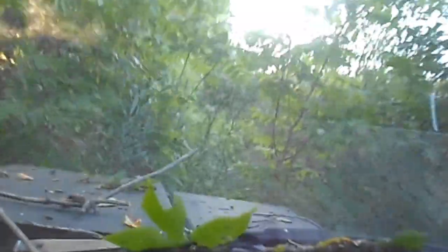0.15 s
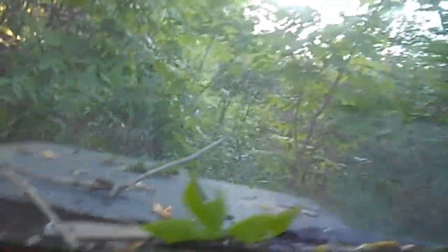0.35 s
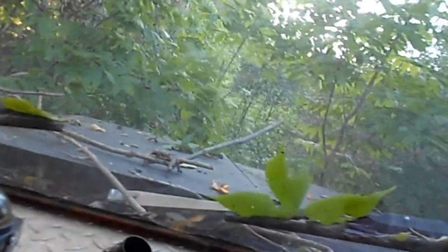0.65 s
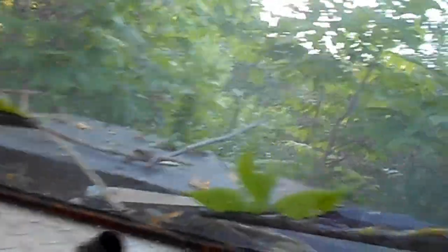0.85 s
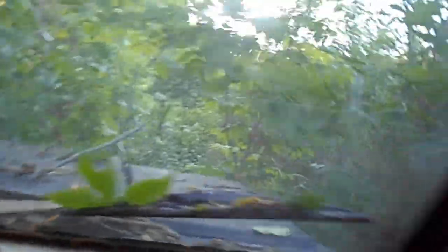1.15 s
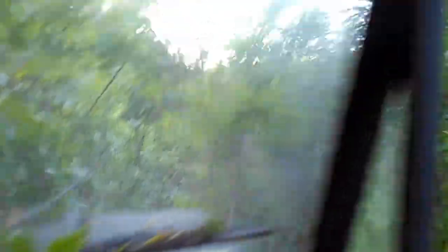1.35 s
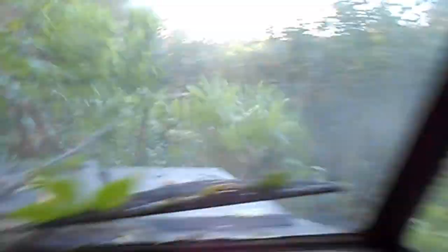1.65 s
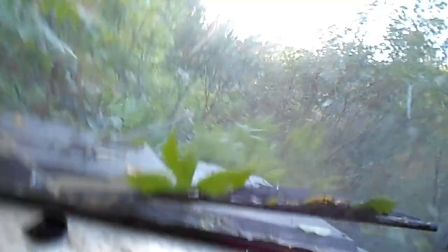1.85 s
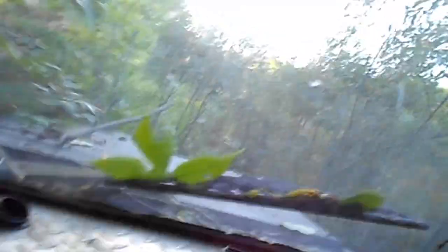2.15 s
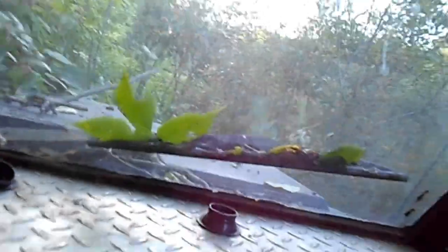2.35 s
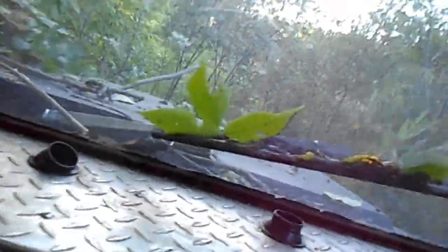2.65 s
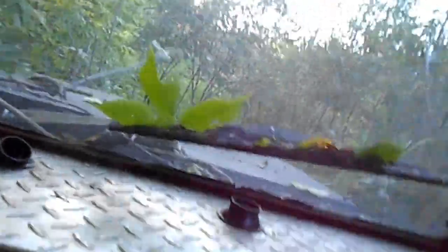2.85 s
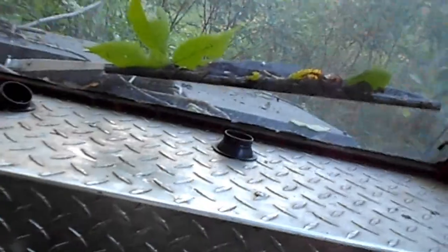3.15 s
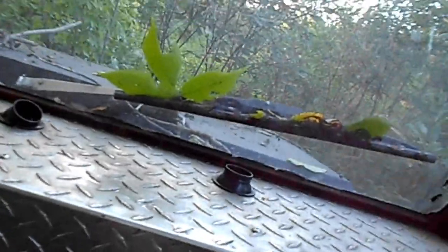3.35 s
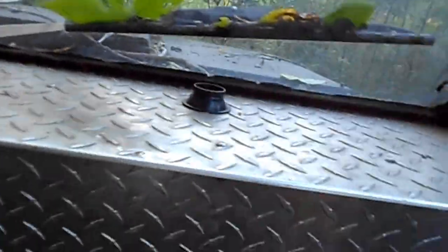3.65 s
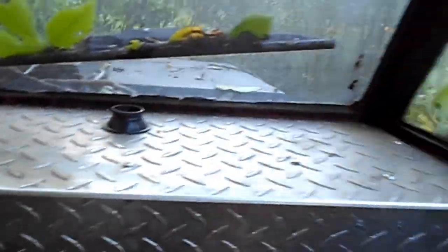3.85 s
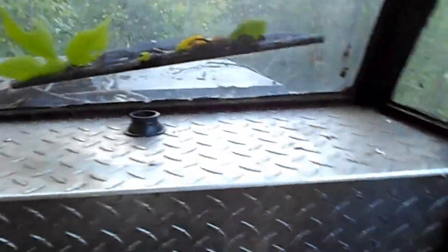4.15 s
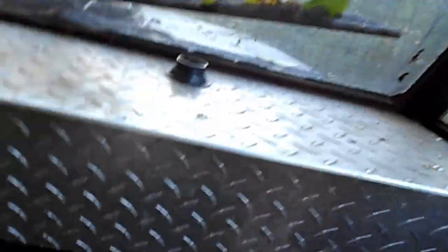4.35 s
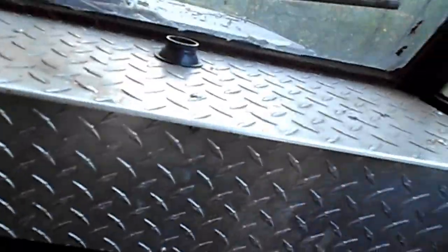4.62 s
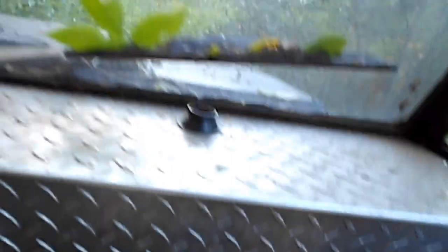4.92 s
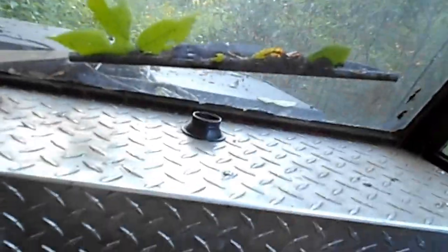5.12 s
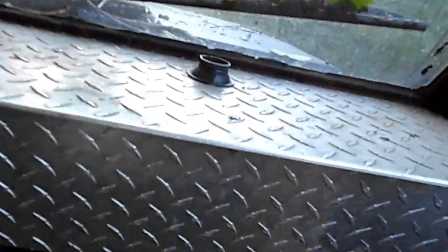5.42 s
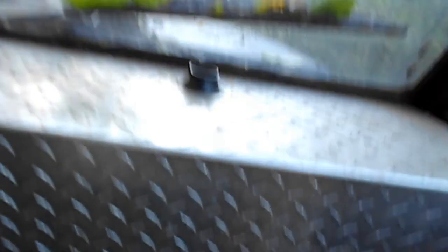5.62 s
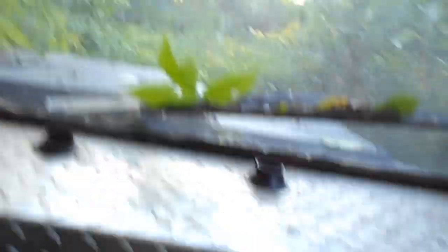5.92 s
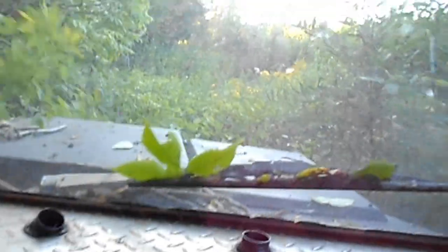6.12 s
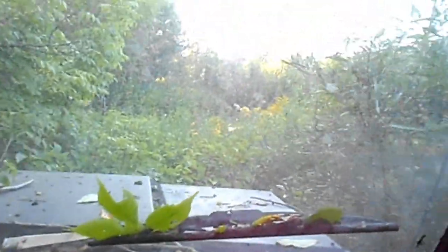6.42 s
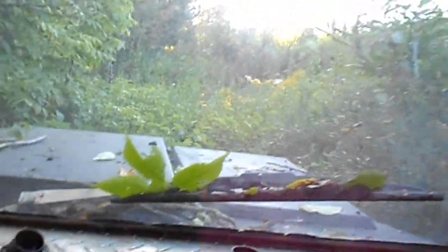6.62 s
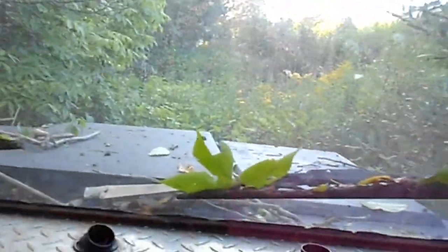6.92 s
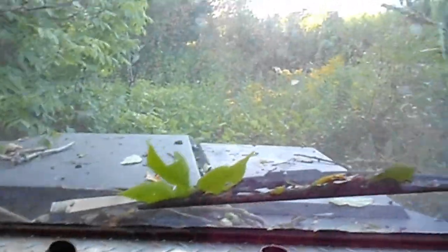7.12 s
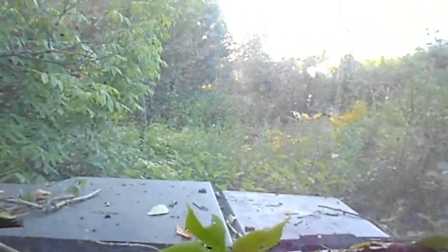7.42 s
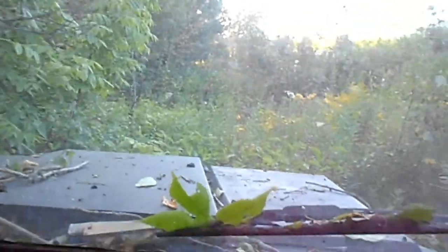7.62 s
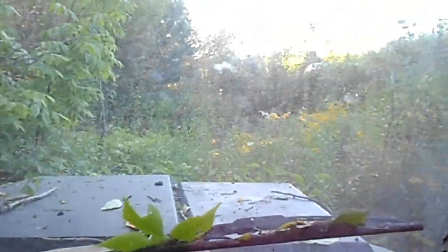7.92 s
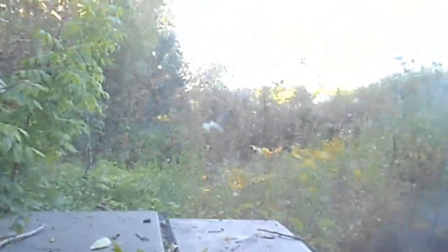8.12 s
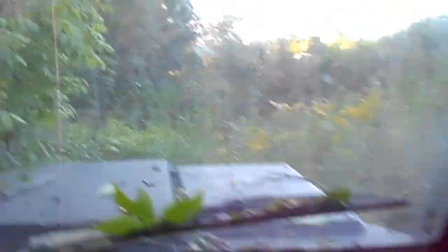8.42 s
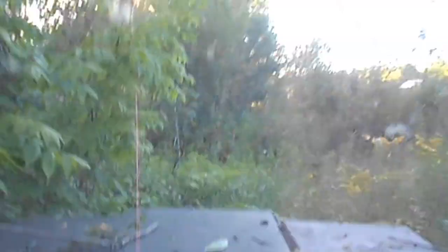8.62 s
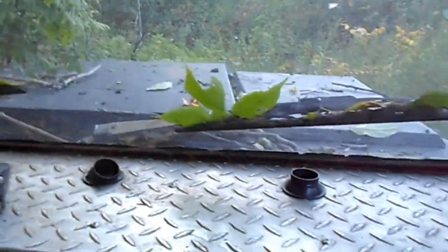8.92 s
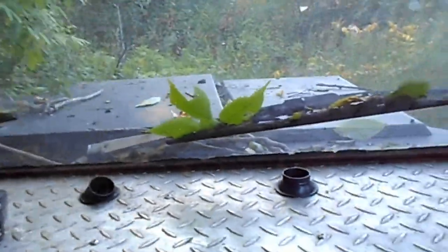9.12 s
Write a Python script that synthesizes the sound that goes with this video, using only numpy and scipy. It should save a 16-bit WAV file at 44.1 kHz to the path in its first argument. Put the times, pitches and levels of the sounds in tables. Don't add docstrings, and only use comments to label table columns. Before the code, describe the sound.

Inside a steel truck cab on an overgrown trail, a deep eight-cylinder engine booms and throbs. Leaves brush the body, twigs snap and drag. Just after two seconds the revs fall through a heavy rut, with thuds, low shudder and a short squeak near four. A steadier crawl follows, then revs leap at seven and a half and drop at nine. Close, handheld cab perspective, bass-heavy, with dull treble.

```python
import sys
import numpy as np
from scipy import signal
from scipy.io import wavfile

SR = 44100
rng = np.random.default_rng(int(sys.argv[2]) if len(sys.argv) > 2 else 0)


def voltage_ratio(level):
    return 10 ** (np.asarray(level, float) / 20)


def to_wav(s):
    ch = np.atleast_2d(s).T
    pcm = np.round(np.clip(ch, -1, 1) * 32767)
    wavfile.write(sys.argv[1], SR, pcm.astype(np.int16))


N = 408807
TIME = np.arange(N) / SR


def rms_one(x):
    return x / np.sqrt(np.mean(x ** 2) + 1e-20)


def in_time(rows):
    s, *columns = np.transpose(rows)
    return [np.interp(TIME, s, c) for c in columns]


def swell(centre, half):
    first, last = round((centre - 3 * half) * SR), round((centre + 3 * half) * SR)
    span = slice(max(first, 0), last)
    return span, np.exp(-((TIME[span] - centre) / half) ** 2)


def bells(rows):
    out = np.zeros((len(rows[0]) - 2, N))
    for centre, half, *heights in rows:
        span, bell = swell(centre, half)
        out[:, span] += np.outer(heights, bell)
    return out


def drift(rate, count=N):
    r = np.exp(-80 * np.pi * rate / SR)
    noise = rng.standard_normal(N // 40 + 2002)
    slow = signal.lfilter([1], [1, -2 * r, r * r], noise)[2000:]
    return np.interp(np.linspace(0, N / 40, count), np.arange(len(slow)), rms_one(slow))


def sine(turns):
    return np.sqrt(2) * np.cos(2 * np.pi * turns)


def band(x, low_hz, high_hz):
    return signal.sosfilt(signal.butter(2, [low_hz, high_hz], "band", fs=SR, output="sos"), x)


def resonate(x, hz, width):
    r = np.exp(-np.pi * width / SR)
    top = (1 - r * r) / 2
    return signal.lfilter([top, 0, -top], [1, -2 * r * np.cos(2 * np.pi * hz / SR), r * r], x)


def coloured(spectrum, patchy_db, flicker_rate, grain_db):
    hz, level_db = np.transpose(spectrum)
    edges = hz[0] * 2 ** np.arange(0, np.log2(min(hz[-1], 13500) / hz[0]), 1 / 3)
    white = rng.standard_normal((2, N)) * voltage_ratio(grain_db * drift(91))
    out, together = 0, drift(flicker_rate)
    for k, (low, high) in enumerate(zip(edges, edges[1:])):
        mean_db = np.interp(np.log(low * high) / 2, np.log(hz), level_db)
        flicker_db = patchy_db * (1.51 * together + drift(flicker_rate))
        out = out + voltage_ratio(mean_db + flicker_db) * band(white[k % 2], low, high)
    return rms_one(out)


# time in seconds, firings per second.
SPEED = [(0.0, 52.45), (0.47, 50.07), (0.81, 58.47), (1.34, 60.6), (2.0, 58.59), (2.13, 60.85),
         (2.27, 51.68), (2.66, 41.88), (2.79, 45.44), (3.6, 42.9), (4.35, 43.67), (4.65, 48.12),
         (7.46, 47.85), (7.65, 61.56), (7.8, 63.91), (8.91, 63.93), (9.09, 51.1), (9.27, 46.15)]
# centre in seconds, half length in seconds,
# extra firings per second.
SPEED_WAVERS = [
    (6.05, .2, -.4),
    (6.7, .25, .68),
    (7.27, .13, -1.17),
    (8.0, .3, .36),
    (8.53, .14, -1.13),
    (8.8, .07, 1.85),
]


def engine_speed():
    return in_time(SPEED)[0] + bells(SPEED_WAVERS)[0]


# multiple of the cycle rate, level in dB at low revs, level in dB at high revs.
UNEVEN = [(3, -51, -46), (4, -51, -45), (5, -49, -41), (6, -48, -34), (7, -35, -25), (9, -34, -29),
          (10, -40, -36), (11, -38, -44), (12, -42, -45), (13, -44, -46), (14, -53, -45), (15, -53, -42),
          (17, -48, -42), (18, -43, -47), (19, -45, -43), (20, -48, -52), (21, -45, -47), (22, -49, -53),
          (23, -46, -52), (24, -51, -57), (25, -50, -61)]
LOW_REVS_HZ, HIGH_REVS_HZ = 49, 58
# firing tone in Hz, its level in dB, its octave's level in dB.
CAB = [(43, -12.0, -55), (46, -11.0, -39), (48, -11.0, -38), (52, -11.4, -35.5), (56, -11.8, -34),
       (59.5, -13.8, -31.5), (64, -13.5, -34.5)]
# time in seconds, level in dB.
THROTTLE = [
    (2.09, -1),
    (2.18, -10),
    (2.67, -12),
    (2.76, -6),
    (3.45, -0.5),
    (8.82, 0.0),
    (9.0, -10),
    (9.13, -3.5),
    (9.27, -6),
]
# centre in seconds, half length in
# seconds, change in dB.
BOOM_SWINGS = [(.55, 0.14, 2), (1.1, 0.94, 2), (2.31, 0.041, 15.5), (2.41, 0.02, 5.5), (2.37, .012, -6),
               (2.47, 0.02, -10), (2.66, .03, -2), (2.53, .03, 4.5), (2.815, 0.022, 7.5), (4.5, 0.12, 1),
               (7.42, 0.097, 1.7)]


def engine(firing_hz, firings):
    throttle_db, = in_time(THROTTLE)
    hz, tone_db, octave_db = np.transpose(CAB)
    tone_db = np.interp(firing_hz, hz, tone_db) + throttle_db + bells(BOOM_SWINGS)[0]
    octave_db = np.interp(firing_hz, hz, octave_db) + 0.67 * throttle_db
    revs = np.clip((firing_hz - LOW_REVS_HZ) / (HIGH_REVS_HZ - LOW_REVS_HZ), 0, 1)
    effort_db = .6 * np.minimum(tone_db + 12, 0)
    revs, effort_db, cycles = revs[::16], effort_db[::16], firings[::16] / 8
    points = len(revs)
    throb = 0
    for order, low_db, high_db in UNEVEN:
        from_firing = abs(order - 8)
        wander = .02 * min(from_firing, 5) * drift(.5, points)
        level_db = low_db + revs * (high_db - low_db) + effort_db + 1.5 * drift(1.5, points) + .5
        start = .1 if from_firing < 3 else rng.random()
        throb = throb + voltage_ratio(level_db) * sine(order * cycles + start + wander)
    tone = voltage_ratio(tone_db) * sine(firings - .05)
    octave = voltage_ratio(octave_db) * sine(2 * firings - .4)
    return tone + octave + signal.resample_poly(throb, 16, 1)[:N]


# time in seconds, level in dB.
RIDE = [(.07, 1), (.8, -2), (1.42, 3), (1.86, 4.5), (2.22, 8.5), (2.5, -1), (2.81, 5.5), (3.33, -1),
        (4.16, 8), (4.49, 4), (5.27, 1), (5.4, 0), (7.2, 0), (7.92, -2.5), (8.85, 3), (9.27, 2.5)]
# centre in seconds, half length in seconds, dB more in the chassis, dB more in the body.
RUTS = [
    (0.0, 0.061, 9, 11.5),
    (2.34, 0.097, 13.5, 6.5),
    (4.24, 0.044, 8, 6.5),
    (4.1, 0.38, -2, -0.5),
    (5.32, 0.041, -.5, 9.5),
    (7.3, 0.097, -1.5, 4.5),
    (7.5, 0.35, 6, -1),
    (8.83, 0.048, -4, 3),
]
# frequency in Hz, dB per Hz.
RUMBLE = [(10, -14), (25, -7), (40, -3), (55, -1), (75, -2), (90, -10), (130, -13), (165, -17), (200, -30)]
GROWL = [(140, -2.5), (180, 1), (250, -6.5), (350, -12.5), (450, -26)]
ROAR = [(240, -27.5), (400, -3), (512, -6), (638, -8), (752, -2.5), (1060, -8), (1380, -15.5), (1650, -19),
        (8210, -42), (10700, -61), (13900, -73), (22000, -120)]


def chassis(firings):
    rough_db, = in_time(RIDE)
    chassis_db, body_db = bells(RUTS)
    rumble_db = -34.5 + 0.81 * rough_db + chassis_db
    growl_db = -44.4 + 0.98 * rough_db + body_db
    roar_db = -51 + rough_db + body_db
    rumble = voltage_ratio(rumble_db) * coloured(RUMBLE, patchy_db=1.5, flicker_rate=9.7, grain_db=1.5)
    growl = voltage_ratio(growl_db) * coloured(GROWL, patchy_db=0.9, flicker_rate=33.0, grain_db=2.0)
    roar = coloured(ROAR, patchy_db=1.5, flicker_rate=9.0, grain_db=1.2)
    roar = roar + voltage_ratio(5) * resonate(roar, 600, 42) + voltage_ratio(2.5) * resonate(roar, 1250, 40)
    puffs = 1 + .2 * sine(firings + .3)
    return rumble + puffs * (growl + voltage_ratio(roar_db) * roar)


# time in seconds, level in dB.
BRUSH = [(0.0, -59), (0.98, -61.5), (1.81, -55), (2.22, -52), (2.37, -62.5), (2.61, -61.5), (3.36, -58),
         (3.44, -52), (3.95, -56.5), (4.16, -49.5), (4.85, -57.5), (5.83, -57), (6.12, -55.5),
         (7.07, -59.5), (7.25, -56.5), (7.67, -64), (8.44, -63.5), (9.27, -57.5)]
# frequency in Hz, dB per Hz.
LEAVES = [(710, -31.5), (1200, -2), (1760, -11), (2020, -10), (2540, -17.5), (4390, -16), (8800, -25),
          (9910, -25), (10700, -39.5), (13900, -65), (22000, -120)]
# frequency in Hz, width in Hz, level in dB.
BODY_RINGS = [(1950, 40, -4), (2440, 30, -3), (3160, 60, -4), (3470, 35, -2), (4230, 80, -5)]


def leaves(firings):
    brush_db, = in_time(BRUSH)
    brush = voltage_ratio(brush_db + 3.5) * coloured(LEAVES, patchy_db=1.15, flicker_rate=20.0, grain_db=-0.5)
    brush = brush + sum(voltage_ratio(db) * resonate(brush, hz, width) for hz, width, db in BODY_RINGS)
    return brush * (1 + 0.15 * sine(firings))


def chatter(firings):
    rough_db, = in_time(RIDE)
    touches_per_s = 260 * voltage_ratio(4.0 * drift(6)) * (1 + .6 * np.cos(2 * np.pi * firings))
    strength = voltage_ratio(2.0 * np.minimum(rng.exponential(1, N), 4)) * rng.choice([-1, 1], N)
    touches = (rng.random(N) < touches_per_s / SR) * strength
    dealt = rng.integers(0, 30, N)
    pitches = np.geomspace(260, 4200, 30) * rng.uniform(.96, 1.04, 30)
    rings = 0
    for k, hz in enumerate(pitches):
        ring = resonate(touches * (dealt == k) + 1e-18, hz, 2.2 * hz / 45)
        slope_db = -6.5 * np.log2(hz / 600) * (hz > 600)
        rings = rings + voltage_ratio(slope_db) * rms_one(ring)
    return voltage_ratio(-55 + rough_db) * rms_one(rings)


# centre in seconds, half length in seconds, frequency in Hz, level in dB.
JOLTS = [(2.13, 0.035, 147, -24), (2.22, 0.063, 154, -29.5), (2.32, 0.027, 146, -24),
         (2.334, 0.021, 30, -10), (2.78, 0.045, 150, -27), (2.09, .03, 118, -26), (2.38, .03, 85, -26),
         (2.42, .05, 145, -33), (2.92, .03, 145, -31), (2.95, .025, 98, -27), (3.95, .03, 170, -33),
         (4.5, .03, 160, -34), (5.33, .04, 210, -38), (6.5, .06, 230, -41), (2.85, 0.12, 10, -21),
         (2.935, 0.0084, 118, -20.5), (4.12, 0.026, 177, -30), (4.23, 0.021, 150, -24),
         (1.97, .1, 135, -32), (7.56, .06, 114, -32), (7.44, .06, 87, -33.5), (0.0491, .06, 155, -36)]


def jolts():
    out = np.zeros(N)
    for centre, half, hz, level_db in JOLTS:
        span, bell = swell(centre, half)
        out[span] += voltage_ratio(level_db) * bell * np.cos(2 * np.pi * hz * (TIME[span] - centre))
    return out


# time in seconds, peak in dB.
TICKS = [(.104, -50), (.1989, -49), (.2818, -47), (.5334, -48), (.7063, -49), (.8564, -54), (1.1374, -49),
         (1.3104, -46.5), (2.1231, -38), (2.3134, -31), (2.9981, -44.5), (5.4694, -46), (6.9676, -43),
         (7.4194, -44), (7.4304, -47), (7.453, -45.5), (7.4652, -34), (7.4774, -45.5), (7.4884, -49),
         (7.5233, -35.5), (7.5354, -45), (7.6859, -46), (8.0915, -52), (8.2294, -48), (8.5235, -50),
         (8.6143, -43), (8.9251, -49), (9.1824, -44)]


def ticks():
    late_s, tail_db, t60_s = .0012, -27, .012
    age = np.arange(round(.05 * SR)) / SR
    click = band(signal.unit_impulse(len(age)), 500, 8500)
    fizz = rms_one(band(rng.standard_normal(N), 1500, 9000))
    out = np.zeros(N)
    for s, peak_db in TICKS:
        start = round((s + late_s) * SR)
        span = slice(start, start + len(age))
        tail = voltage_ratio(tail_db - 60 * age / t60_s) * fizz[span]
        out[span] += voltage_ratio(peak_db + 1.5) * (click / click.max() + tail)
    return out


# frequency in Hz, width in Hz, level in dB.
PANELS = [(592, 70, 5), (1400, 400, 3), (3200, 300, 0), (4230, 200, 0), (5350, 120, 0)]


def panels(x):
    return x + sum(voltage_ratio(level_db) * resonate(x, hz, width) for hz, width, level_db in PANELS)


def rattle():
    strength = voltage_ratio(2.3 * np.minimum(rng.exponential(1, N), 4)) * rng.choice([-1, 1], N)
    clicks = (rng.random(N) < 2500.0 / SR) * strength
    dealt = rng.integers(0, 16, N)
    rings = 0
    for k, hz in enumerate(np.geomspace(550, 9000, 16)):
        rings = rings + resonate(clicks * (dealt == k) + 1e-18, hz, hz / 16)
    scrape = voltage_ratio(8.0) * rng.standard_normal(N) * voltage_ratio(0.52 * drift(300))
    return panels(rms_one(rings) + scrape)


# time in seconds, peak in dB, thud in dB, seconds to fade by 60 dB.
SNAPS = [(.1429, -50.5, 16, 0.048), (0.1642, -40.5, -2, 0.024), (.7562, -48.5, 7.5, 0.078),
         (.982, -33, -2, 0.07), (1.0784, -44, -16, .047), (1.092, -33.5, 0.5, .033),
         (1.2155, -29.5, -23, 0.016), (1.518, -40.5, -5, 0.096), (2.3014, -36.5, -10, 0.12),
         (2.3202, -34, 13.5, 0.029), (2.574, -47, -1, 0.09), (2.8184, -42, 0, 0.18),
         (4.165, -36.5, 2, .044), (5.256, -29, 0, .1), (5.8806, -42, 4, 0.035), (6.0643, -26.5, -2.5, 0.15),
         (6.349, -45.5, -10, .087), (6.988, -44, -1, .12), (8.404, -54, 16, 0.04)]
KNOCKS = [
    (.9665, -37, 1, 0.017),
    (1.9295, -35, 7, .1),
    (2.3342, -35, -14, 0.08),
    (7.2315, -30, -19, 0.14),
]
# time in seconds, peak in dB, drag in seconds.
DRAGS = [(.2588, -44.5, 0.025), (0.9228, -35.5, 0.024), (1.4785, -47.5, 0.045), (1.8143, -38.5, 0.032),
         (1.886, -44, 0.029), (2.1694, -44, .035), (2.867, -41.5, .035), (4.342, -26, .016),
         (4.5504, -40.5, .023), (6.0104, -40, 0.009), (6.077, -37, .07), (6.268, -44.5, 0.01),
         (6.5394, -37.5, 0.015), (7.248, -31.5, 0.021), (7.289, -36, 0.045)]
# time in seconds, peak in dB, thud in dB, drag in seconds.
BOUGHS = [(.4207, -38, 4, 0.022), (1.2146, -40, 9, 0.013), (2.1106, -42, 11.5, 0.042),
          (2.2173, -41, 10.5, .032), (2.2432, -36.5, 3, .025), (2.359, -42.5, 10, .027),
          (2.7227, -40.5, 8.5, 0.029), (2.775, -48.5, 17, 0.056), (3.407, -46, 9, .052),
          (3.9146, -39.5, 8.5, .023), (3.96, -45, 14, .054), (4.2064, -32, 12, 0.031),
          (4.3548, -37, 14.5, 0.014), (4.682, -38.5, 8.5, .027), (4.734, -57, 25.5, 0.013),
          (4.9723, -40, 9.5, .035), (5.0746, -39, 10.5, 0.032), (5.2707, -37, 6.5, .041),
          (5.3174, -47, 14.5, 0.056), (5.5747, -43.5, 9.5, 0.032), (5.6194, -49.5, 5, .027),
          (5.8341, -49, 9, .066), (6.1314, -49, 18, 0.041), (6.1894, -40.5, 1.5, .039),
          (6.4958, -39, 6.5, 0.014), (6.769, -45.5, 11.5, 0.039), (7.0624, -39, 2.5, .018),
          (8.15, -52, 3, .05), (8.5494, -47.5, 5.5, .058), (9.11, -43.5, 6.5, 0.046)]
SNAP_TREBLE_DB, KNOCK_TREBLE_DB, DRAG_TREBLE_DB = -6.5, -19, -13
MIDDLING_DB, DULLING_PER_DB = -41.5, 0.67


def whips():
    noise, tick = rattle(), signal.unit_impulse(round(.3 * SR))
    edges = (450, 2200), (1700, 5500), (5000, 11500)   # thud, middle, treble in Hz
    parts = [rms_one(band(noise, *edge)) for edge in edges]
    clicks = [band(tick, *edge) for edge in edges]
    clicks = [click / click.max() for click in clicks]
    # start, peak, thud, treble, hold s, rise s, fade s, rattle level dB, hard tick
    blows = []
    for rows, treble_db in ((SNAPS, SNAP_TREBLE_DB), (KNOCKS, KNOCK_TREBLE_DB)):
        for s, peak_db, thud_db, t60 in rows:
            blows.append((s, peak_db, thud_db, treble_db, .001, .0004, t60, -9.0, .9))
    branches = BOUGHS + [(s, peak_db, -4, drag) for s, peak_db, drag in DRAGS]
    for s, peak_db, thud_db, drag in branches:
        blows.append((s, peak_db, thud_db, DRAG_TREBLE_DB, drag, .003, .11, -11.0, 0))
    out = np.zeros(N)
    for s, peak_db, thud_db, treble_db, hold, rise, t60, crest_db, hard in blows:
        span = slice(round(s * SR), round(s * SR) + len(tick))
        age = TIME[span] - s
        treble_db = treble_db - DULLING_PER_DB * (peak_db - MIDDLING_DB) + 1
        fade_in = np.clip(age / rise, 0, 1)
        for part, click, part_db, last in zip(parts, clicks, (thud_db, 0, treble_db), (1.4, 1, .8)):
            tail_db = crest_db - 60 * np.maximum(age - hold, 0) / (t60 * last + .004)
            rattling = voltage_ratio(tail_db) * fade_in * part[span]
            out[span] += voltage_ratio(peak_db + part_db) * (rattling + hard * click[:len(age)])
    return out


# centre in seconds, half length in seconds, frequency in Hz, level in dB.
GROANS = [(.36, 0.071, 310, -44), (0.456, 0.03, 820, -37.5), (1.3, 0.062, 275, -45), (3.6, 0.16, 730, -46),
          (.968, 0.0033, 1650, -37.5), (.983, 0.0035, 2050, -39), (1.095, .0042, 2130, -39.5),
          (2.128, .01, 2150, -47), (2.875, .015, 4600, -53), (4.377, 0.0056, 1400, -38),
          (1.2175, 0.002, 5370, -34), (1.55, 0.025, 780, -49), (2.294, 0.07, 990, -37.5),
          (2.716, 0.015, 543, -39.5), (4.25, 0.047, 720, -34.5), (4.354, 0.0096, 1480, -29),
          (5.307, 0.034, 980, -42), (6.14, .049, 1280, -39), (7.29, 0.066, 1690, -42),
          (8.57, .032, 810, -48.5), (7.15, .08, 756, -48), (8.8, 0.027, 1010, -42.5), (8.62, .08, 330, -46),
          (4.87, .05, 400, -46), (.8, .08, 620, -50), (8.803, 0.035, 380, -32.5)]
CREAKS = [(.945, 0.017, 2270, -51), (1.084, .005, 2100, -50), (2.127, .008, 750, -42),
          (2.243, .008, 1220, -41), (2.28, 0.017, 1220, -39), (2.79, .012, 2050, -46),
          (7.415, .015, 2990, -59), (1.23, .04, 300, -39.5), (1.231, 0.048, 570, -39),
          (3.946, 0.031, 1150, -40), (3.996, 0.022, 1230, -35.5), (4.704, 0.031, 1370, -41),
          (5.002, 0.057, 1370, -43), (5.115, 0.036, 1040, -40.5), (6.035, 0.023, 1200, -45.5),
          (6.391, .015, 1070, -40), (5.7, .1, 6800, -67), (6.787, 0.013, 617, -39.5),
          (7.252, 0.014, 1370, -37), (7.238, .01, 800, -41), (7.25, .02, 4200, -49),
          (7.243, .01, 5300, -51), (7.39, .012, 1450, -52), (8.18, .025, 2300, -57), (8.79, .02, 1100, -45),
          (5.13, .025, 800, -46), (1.55, .02, 700, -47), (.63, .01, 900, -48), (2.75, .02, 1050, -46),
          (4.25, .025, 600, -40), (6.14, .02, 1400, -44), (7.32, .025, 4250, -53), (1.515, .012, 7000, -55),
          (.43, .015, 7200, -59), (6.07, .015, 8000, -53), (7.48, 0.011, 1950, -48.5),
          (8.497, .013, 1310, -46.5), (8.5, 0.014, 780, -45)]
SQUEALS = [
    (5.89, 0.022, 1150, -44),
    (5.855, .015, 1200, -50),
    (5.96, .03, 1130, -51),
    (5.84, .015, 1980, -54),
    (6.13, .03, 4200, -58),
    (6.12, .02, 4970, -57),
    (7.1, .012, 4970, -62),
    (7.425, .015, 5230, -60),
]


def creaks():
    slips = (rng.random(N) < 2500.0 / SR) * rng.standard_normal(N) + 1e-18
    out = np.zeros(N)
    for rows, width_hz in ((CREAKS, 113), (GROANS, 455), (SQUEALS, 29)):
        for centre, half, hz, level_db in rows:
            span, bell = swell(centre, half)
            ring = resonate(slips[span], hz, 2.3 * width_hz)
            ring = resonate(ring, hz, 2.3 * width_hz)
            out[span] += voltage_ratio(level_db) * bell * rms_one(band(ring, hz / 3, 1.8 * hz))
    return out


# time in seconds, shaft in Hz, shaft level in dB, axle in Hz, axle level in dB.
SHUDDER = [
    (2.2, 28, -68, 72.93, -73),
    (2.45, 29.1, -54, 70.3, -32.5),
    (2.9, 28.77, -23, 71.6, -27),
    (3.4, 28.06, -30, 75.1, -41),
    (3.8, 29.96, -38, 61.5, -53),
    (4.2, 29.5, -45, 61, -29),
    (4.5, 28.5, -65, 63.7, -65),
]


def driveline():
    shaft_hz, shaft_db, axle_hz, axle_db = in_time(SHUDDER)
    shaft = voltage_ratio(shaft_db) * sine(np.cumsum(shaft_hz + 0.32 * drift(3.2)) / SR)
    axle = voltage_ratio(axle_db) * sine(np.cumsum(axle_hz + 0.5 * drift(3.2)) / SR)
    return shaft + axle


# centre in seconds, half length in seconds, slips per second, level in dB.
SQUEAKS = [
    (4.072, .021, 2090, -33),
    (4.11, .012, 2100, -43),
]
SQUEAK_OVERTONES_DB = [-10, -27, -21, -18]


def squeaks():
    out, grip, wobble = np.zeros(N), drift(250), drift(250)
    for centre, half, hz, level_db in SQUEAKS:
        span, bell = swell(centre, half)
        turns = np.cumsum(hz * (1 + .015 * wobble[span])) / SR
        overtones = sum(voltage_ratio(db) * sine((k + 2) * turns) for k, db in enumerate(SQUEAK_OVERTONES_DB))
        tone = sine(turns) + bell * overtones
        out[span] += voltage_ratio(level_db + 4.0 * grip[span]) * bell * tone
    return out


def scene():
    firing_hz = engine_speed()
    firings = np.cumsum(firing_hz) / SR
    machine = engine(firing_hz, firings) + chassis(firings) + jolts() + driveline()
    plants = leaves(firings) + ticks() + whips()
    trim = chatter(firings) + creaks() + squeaks()
    return (machine + plants + trim)[None]


def low_pass(x):
    return signal.sosfilt(signal.butter(12, 10810, fs=SR, output="sos"), x)


def record(dry):
    cut = signal.sosfilt(signal.cheby2(16, 50, 11000, fs=SR, output="sos"), dry)
    return low_pass(cut)


dry = scene()
out = record(dry)
to_wav(out)
```